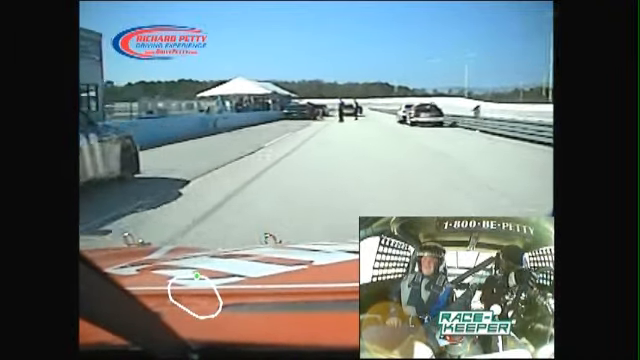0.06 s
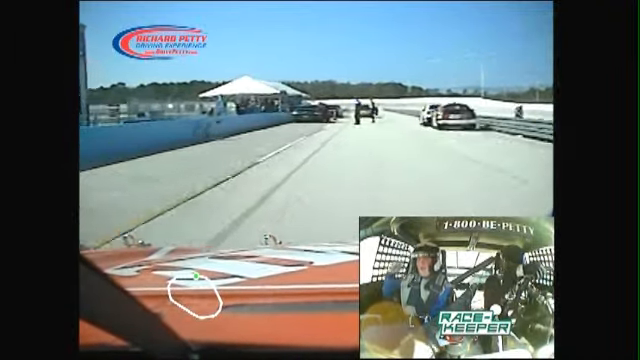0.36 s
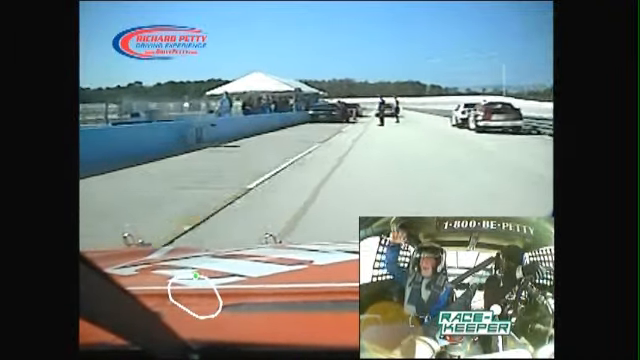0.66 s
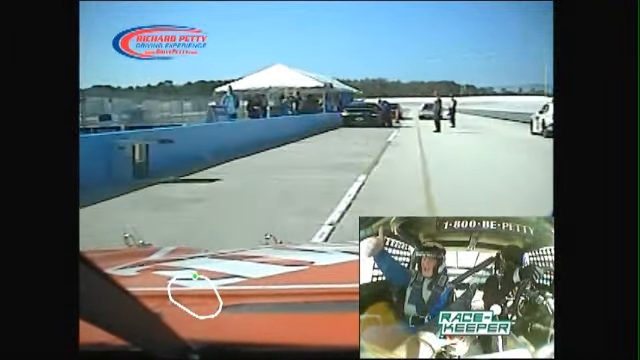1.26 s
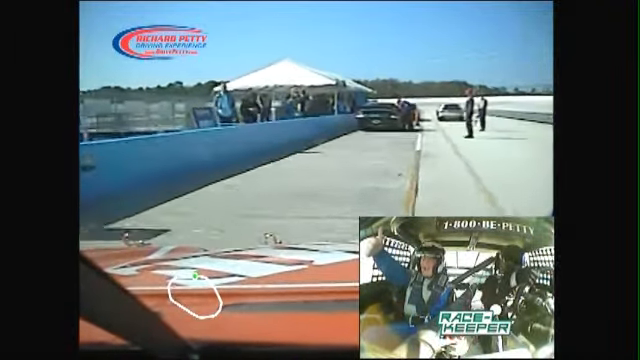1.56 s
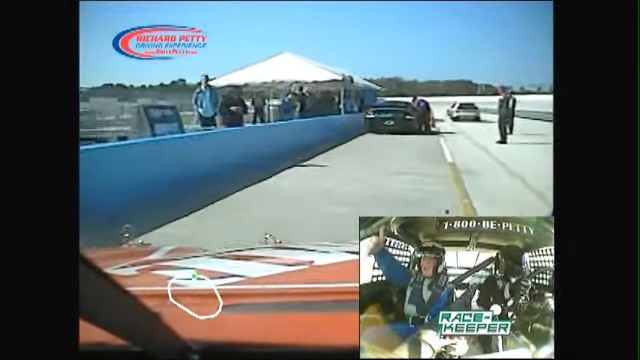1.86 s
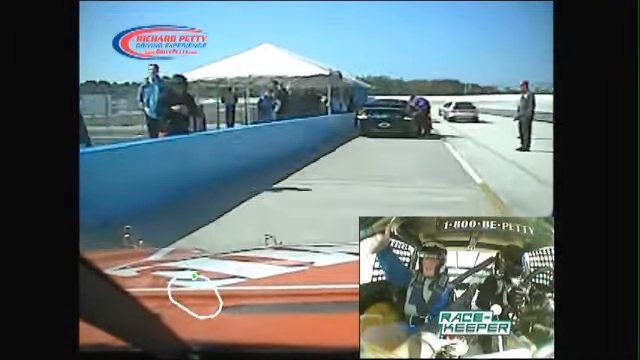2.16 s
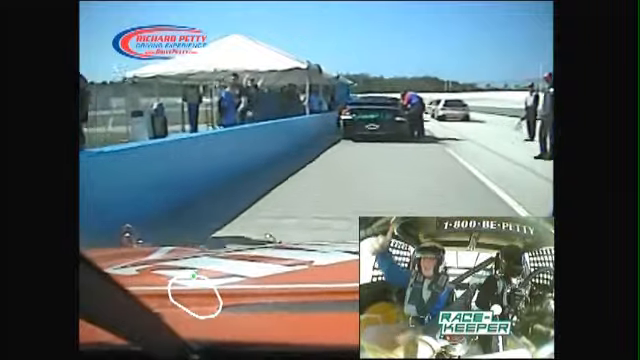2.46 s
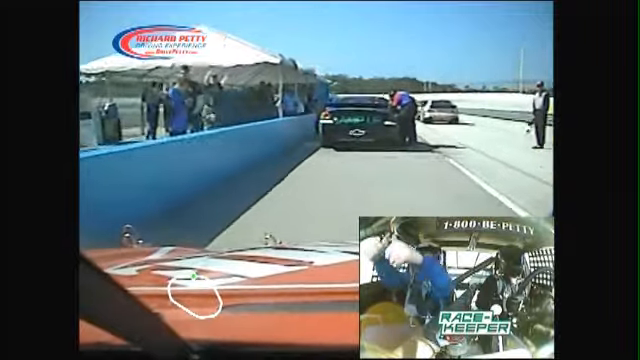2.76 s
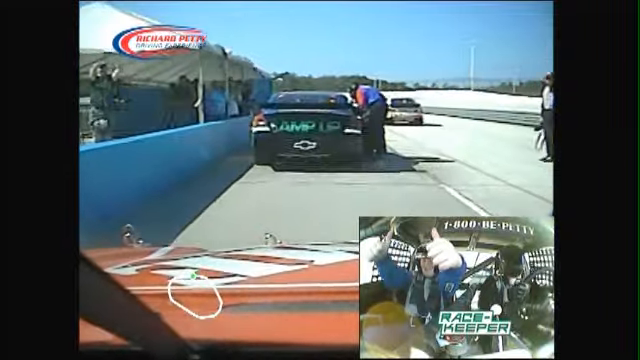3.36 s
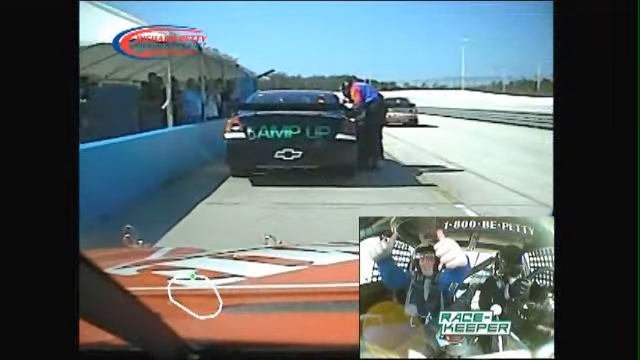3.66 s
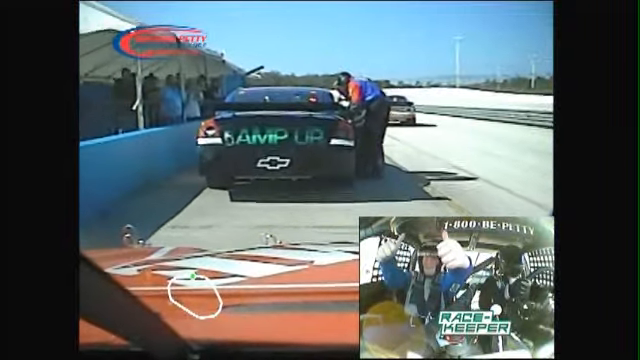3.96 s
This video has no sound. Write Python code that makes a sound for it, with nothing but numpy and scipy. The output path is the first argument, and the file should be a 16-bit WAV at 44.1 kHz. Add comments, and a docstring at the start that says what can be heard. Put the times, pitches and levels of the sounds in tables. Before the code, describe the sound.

Brakes squeal at a very high pitch, pause, then squeal again while a race car's engine rumbles low with two short revs. It is heard from inside the open cabin in a pit lane, through an overloaded, crackling microphone.

```python
"""Inside a stock car rolling down a pit lane, the V8 rumbles and the open cabin booms.
At 0.7 s a brake disc starts to squeal near 13 kHz; the throttle gets a nudge, then a blip at 1.2 s.
The squeal fades at 2 s and returns at 2.6 s. A second blip comes at 3 s; a loose part rattles near the end.
Throughout, the on-board recorder overloads, so the engine crackles and chops the squeal."""
import sys
import numpy as np
from scipy import signal
from scipy.fft import rfft, irfft
from scipy.io import wavfile

SR = 44100
rng = np.random.default_rng(int(sys.argv[2]) if len(sys.argv) > 2 else 0)


def generate_wav(sig):
    """Save sig (samples, or channels by samples) to the path in sys.argv[1] as 16-bit PCM at SR."""
    pcm = np.round(np.clip(np.atleast_2d(sig).T, -1, 1) * 32767).astype(np.int16)
    wavfile.write(sys.argv[1], SR, pcm)


N = 176400
T = np.arange(N) / SR


def amp(db):
    """Decibels to gain."""
    return 10 ** (np.asarray(db) / 20)


def unit(x):
    """Scale to rms 1."""
    return x / np.sqrt(np.mean(x ** 2) + 1e-20)


def curve(table):
    """Value columns of a time table, interpolated per sample."""
    time_s, *columns = np.transpose(table)
    return [np.interp(T, time_s, column) for column in columns]


def noise(spectrum):
    """Noise of rms 1 with the given spectral shape."""
    hz, db = np.transpose(spectrum)
    gain = amp(np.interp(np.log(np.fft.rfftfreq(N, 1 / SR) + 1), np.log(hz), db))
    return unit(irfft(rfft(rng.standard_normal(N)) * gain, N))


def drift(rate_hz):
    """Random wander of rms 1, up to about rate_hz."""
    gain = np.exp(-(np.fft.rfftfreq(N, 1 / SR) / rate_hz) ** 2)
    return unit(irfft(rfft(rng.standard_normal(N)) * gain, N))


def burst(start_s, level_db, decay_s, attack_s=0.0048):
    """Envelope: linear attack, exponential decay."""
    rise = np.clip((T - start_s) / attack_s, 0, 1)
    fall = np.exp(-np.maximum(T - start_s - attack_s, 0) / decay_s)
    return amp(level_db) * rise * fall


def swell(start_s, peak_s, end_s, level_db):
    """Triangular envelope."""
    return amp(level_db) * np.interp(T, [start_s, peak_s, end_s], [0, 1, 0])


# Engine orders: firing_multiple, level_db
ORDERS = [(.375, -12.5), (.5, -22), (.75, -18), (1, -0.5), (1.25, -17), (1.5, -14.5), (1.75, -18),
          (1.998, -8), (2.5, -22), (3, -23.5)]
# Cabin resonances: centre_hz, half_width_hz, lift_db
CABIN_MODES = [(113, 14, 2), (203, 4.6, 5), (233.6, 9.6, 7), (268.7, 19, 2), (416, 13, 0.5)]


def firing_note(firing_hz, phase):
    """Fluttering orders, lifted as they cross cabin resonances; uneven cylinders give the fractions."""
    note = 0
    for order, level_db in ORDERS:
        cabin_db = sum(lift_db / (1 + ((order * firing_hz - centre_hz) / half_width_hz) ** 2)
                       for centre_hz, half_width_hz, lift_db in CABIN_MODES)
        flutter = 1 + 0.33 * drift(rate_hz=12.8)
        multiple = np.round(order * 8) / 8  # 8 firings per engine cycle
        tone = np.sqrt(2) * np.cos(multiple * phase + 2 * np.pi * rng.random())
        note += amp(level_db + cabin_db) * flutter * tone
    return note


# Engine speed: time_s, firing_hz
ENGINE_SPEED = [(0, 120), (.35, 113), (.6, 110), (.76, 105), (.85, 116), (.93, 136), (1.07, 130),
                (1.22, 161), (1.56, 154), (1.79, 136), (2.15, 118), (2.48, 106), (2.75, 102), (2.87, 107),
                (3.02, 168), (3.25, 144), (3.5, 118), (3.66, 106), (4, 92)]
# Engine effort: time_s, note_db, roar_db
ENGINE_EFFORT = [(0, -17.5, -15.5), (.16, -15, -14.5), (.55, -18, -15.5), (.75, -20, -16.5),
                 (.9, -10.5, -11.5), (1.06, -17.5, -14), (1.22, -9, -10.5), (1.38, -21, -9.5),
                 (1.55, -21, -14), (1.8, -13.5, -14), (2.25, -15.5, -16), (2.5, -19.5, -18.5),
                 (2.82, -17, -17.5), (2.93, -8.5, -12.5), (3.02, -8, -8), (3.12, -22.5, -12.5),
                 (3.4, -14.5, -14), (3.62, -18, -18.5), (4, -22.5, -22.5)]
# Exhaust rasp, jumps with throttle: time_s, level_db
RASP_LEVEL = [(0, -34.5), (.78, -33.5), (.91, -27.5), (1.05, -37.5), (1.16, -24), (1.25, -22.5), (1.4, -36),
              (2.3, -34.5), (2.84, -35), (2.91, -23), (2.98, -23.5), (3.02, -19), (3.08, -29),
              (3.35, -35.5), (3.55, -42), (3.88, -36.5), (4, -66)]
# Exhaust roar: freq_hz, density_db
ROAR_SPECTRUM = [(20, -26), (80, -7.5), (130, -2), (180, 2.5), (260, 4.5), (340, -8), (500, -15.5),
                 (800, -19.5), (1200, -20.5), (2000, -31.5), (4000, -42.5), (7000, -58), (14000, -56)]
# Exhaust rasp: freq_hz, density_db
RASP_SPECTRUM = [(200, -20), (600, -6), (1300, 10), (3000, -4), (6000, -9), (14000, -7)]


def engine():
    """V8 firing note, with exhaust roar and rasp that puff at each firing."""
    firing_hz = curve(ENGINE_SPEED)[0] * (1 + 0.011 * drift(rate_hz=21.06))
    phase = 2 * np.pi * np.cumsum(firing_hz) / SR
    note_db, roar_db = curve(ENGINE_EFFORT)
    note = amp(note_db) * firing_note(firing_hz, phase)
    roar = amp(roar_db) * noise(ROAR_SPECTRUM)
    rasp = amp(curve(RASP_LEVEL)[0]) * noise(RASP_SPECTRUM)
    puffs = unit(1 + 0.35 * np.cos(phase))
    lope_db = 0.6 * drift(rate_hz=13.7)
    return amp(lope_db) * (note + puffs * (roar + rasp))


# Squeal loudness: time_s, level_db
SQUEAL_LEVEL = [(0, -62), (.36, -50), (.42, -29), (.47, -57), (.65, -42), (.69, -20), (.75, -18.5),
                (.83, -15), (.87, -19), (1.06, -14.5), (1.17, -16), (1.38, -13), (1.7, -12), (1.83, -17),
                (1.9, -12.5), (1.99, -17), (2.05, -25.5), (2.2, -49), (2.44, -61), (2.5, -46),
                (2.58, -36.5), (2.68, -19.5), (2.8, -27.5), (2.9, -19), (3.08, -27.5), (3.22, -14.5),
                (3.31, -24), (3.37, -28), (3.44, -19.5), (3.55, -18), (3.755, -26), (3.78, -19),
                (3.85, -20.5), (3.93, -22.5), (3.97, -16), (4, -30)]
# Squeal tone: time_s, pitch_hz, fuzz_share
SQUEAL_TONE = [(.4, 13120, 0.7), (.8, 12990, 0.32), (1.65, 12900, 0.14), (1.98, 12910, 0.56),
               (2.1, 13200, 0.82), (2.5, 13100, 0.42), (2.75, 13050, 0.5), (3.5, 12960, 0.2),
               (4, 12975, 0.4)]


def brake_squeal(wobble_hz=39.8, fuzz_width_hz=420):
    """One high disc mode, part locked, part fuzzy; harder braking lowers the pitch."""
    pitch_hz, fuzz_share = curve(SQUEAL_TONE)
    pitch_hz += wobble_hz * drift(rate_hz=90)
    carrier = np.exp(2j * np.pi * np.cumsum(pitch_hz) / SR)
    pole = np.exp(-np.pi * fuzz_width_hz / SR)
    white = rng.standard_normal(N) + 1j * rng.standard_normal(N)
    fuzz = signal.lfilter([(1 - pole) ** 2], [1, -2 * pole, pole ** 2], white)
    locked = np.sqrt(1 - fuzz_share) * unit(carrier.real)
    fuzzy = np.sqrt(fuzz_share) * unit((carrier * fuzz).real)
    flicker_db = drift(rate_hz=20)
    return amp(curve(SQUEAL_LEVEL)[0] + flicker_db) * (locked + fuzzy)


# Pad hiss: time_s, level_db
PAD_LEVEL = [(0, -47), (.6, -47), (.9, -35), (1.9, -35), (2.25, -41.5), (2.6, -37.5), (3.0, -38),
             (3.5, -48), (4, -48)]
# Pad scrapes: start_s, level_db, decay_s
PAD_SCRAPES = [(.195, -39, 0.022), (.607, -27, 0.013), (2.363, -34, 0.01)]
# Pad friction: freq_hz, density_db
PAD_SPECTRUM = [(3000, -13), (7000, -11.5), (10500, -1), (12500, 12.5), (14000, 17), (16000, -13)]


def brake_pads():
    """Pads rub the disc: flickering hiss and three short scrapes."""
    flicker_db = 5.5 * drift(rate_hz=25)
    hiss = amp(curve(PAD_LEVEL)[0] + flicker_db)
    scrapes = sum(burst(*row) for row in PAD_SCRAPES)
    return (hiss + scrapes) * noise(PAD_SPECTRUM)


# Steady buffet: freq_hz, density_db
BUFFET_SPECTRUM = [(8, -34), (20, 1), (32, -11.5), (52, -1), (75, -7.5), (130, -13), (400, -60.5)]
# Throttle-off booms: start_s, peak_s, end_s, level_db
LURCHES = [(1.152, 1.35, 1.6, -19.5), (3.005, 3.082, 3.305, -13.5)]
# Throttle-off boom: freq_hz, density_db
LURCH_SPECTRUM = [(25, -22), (52, -4.5), (62, 4), (72, -2), (110, -24), (300, -76)]


def buffet(steady_db=-19.5):
    """Air and body shake boom in the open cabin, more as the throttle shuts."""
    steady = amp(steady_db) * noise(BUFFET_SPECTRUM)
    lurches = sum(swell(*row) for row in LURCHES) * noise(LURCH_SPECTRUM)
    return steady + lurches


# Loose part: freq_hz, density_db
RATTLE_SPECTRUM = [(500, 1), (2000, -1), (4500, -12), (7500, -5), (11000, -3), (14000, -6)]


def rattle():
    """A loose part rattles once."""
    return burst(start_s=3.867, level_db=-26, decay_s=0.012) * noise(RATTLE_SPECTRUM)


def scene():
    """One cabin microphone feeds both channels."""
    mono = engine() + brake_squeal() + brake_pads() + buffet() + rattle()
    return np.array([mono, mono])


# Faint steady noise floor, common to both channels: freq_hz, density_db
FLOOR_SPECTRUM = [(50, -31), (1000, 4), (3000, -8), (7000, -17.5), (11000, -12), (14000, -8)]
# Hiss, independent per channel: freq_hz, density_db
HISS_SPECTRUM = [(30, 6), (200, -9), (1000, -14.5), (2500, -24), (5000, -20), (9000, 1.5), (13000, 1),
                 (14500, 6.5)]


def record(dry, clip_level=0.326, clip_rate_hz=48000, floor_db=-40.5, hiss_db=-48, cutoff_hz=14400):
    """Hard digital clipping folds the squeal's third harmonic to about 9 kHz; faint noise; low-pass."""
    upsampled = signal.resample(dry, N * clip_rate_hz // SR, axis=1)
    clipped = signal.resample(np.clip(upsampled, -clip_level, clip_level), N, axis=1)
    floor = amp(floor_db) * noise(FLOOR_SPECTRUM)
    hiss = amp(hiss_db) * np.array([noise(HISS_SPECTRUM), noise(HISS_SPECTRUM)])
    low_pass = signal.firwin(401, cutoff_hz, window=("kaiser", 8), fs=SR)
    return signal.oaconvolve(clipped + floor + hiss, low_pass[None], "same")


dry = scene()
out = record(dry)
generate_wav(out)
```